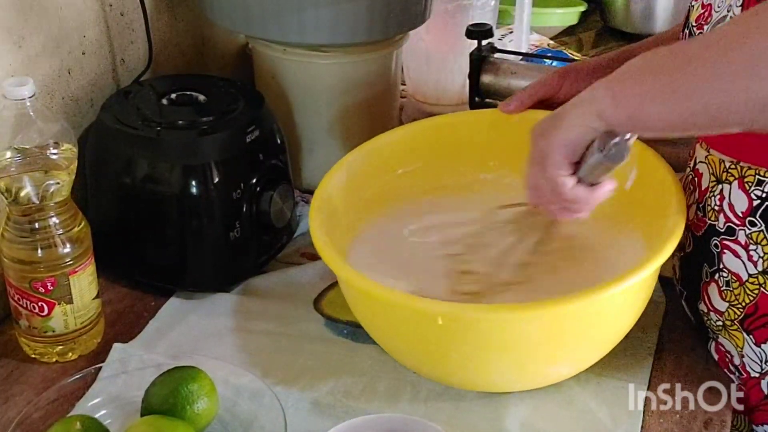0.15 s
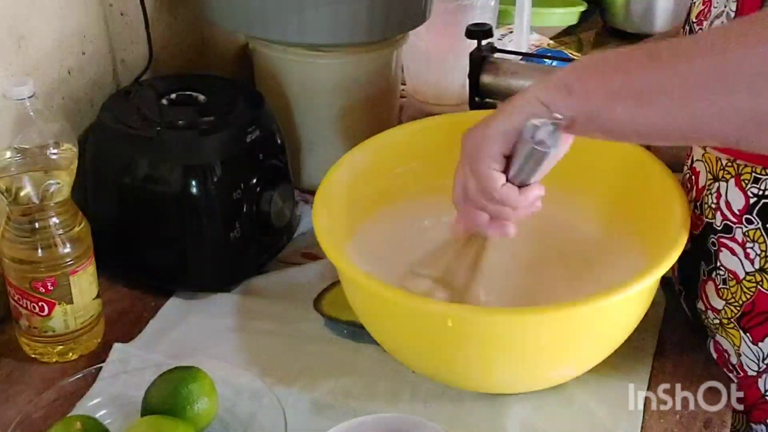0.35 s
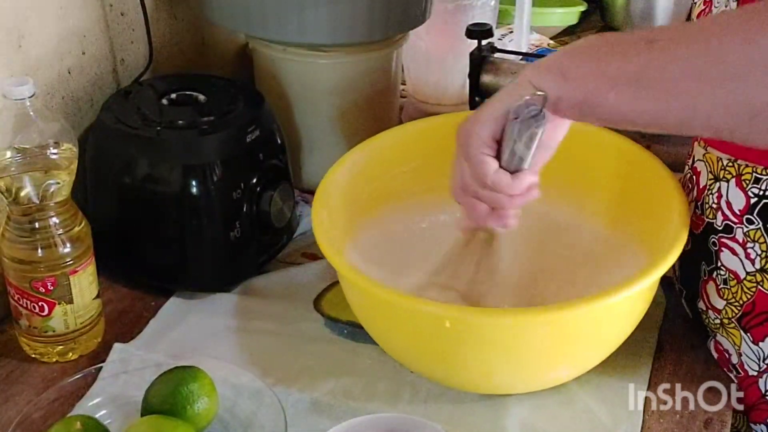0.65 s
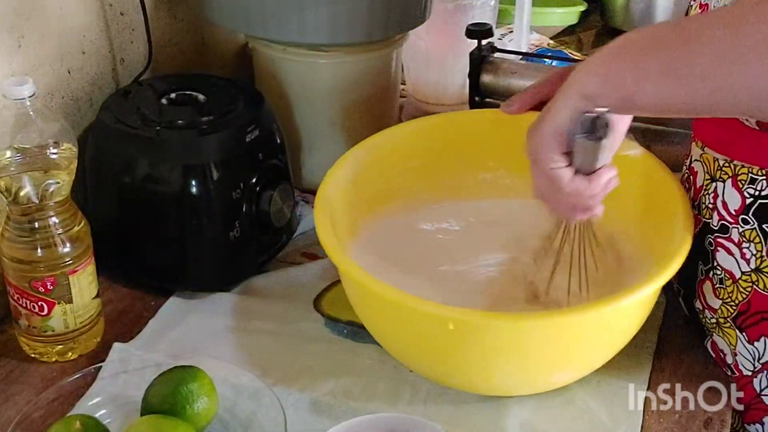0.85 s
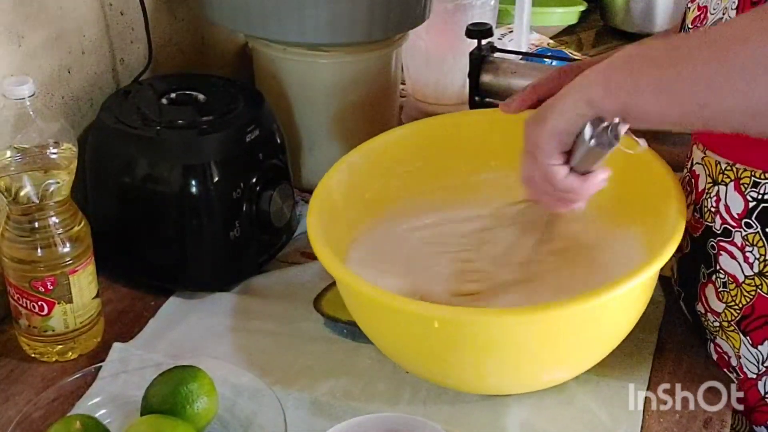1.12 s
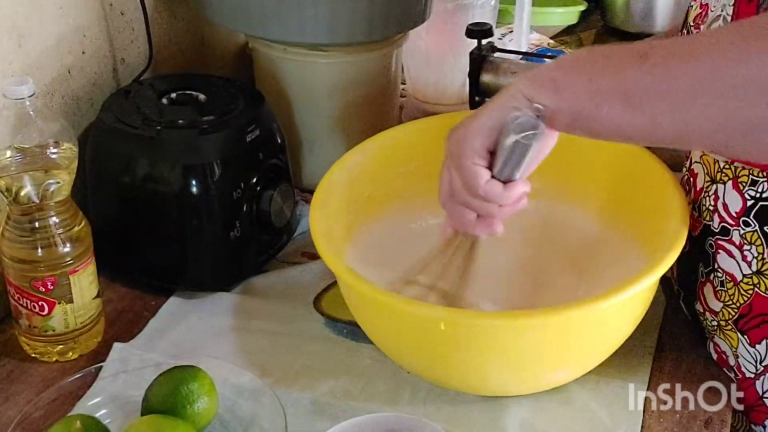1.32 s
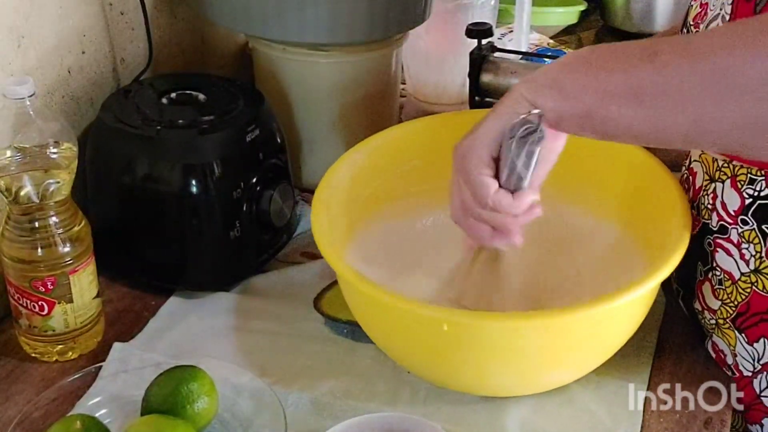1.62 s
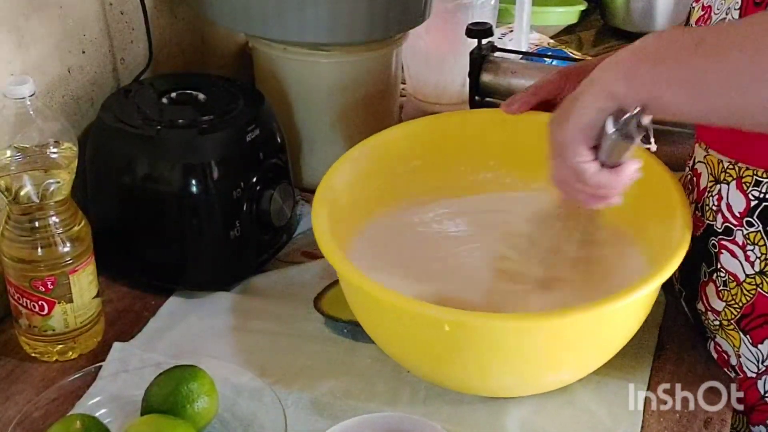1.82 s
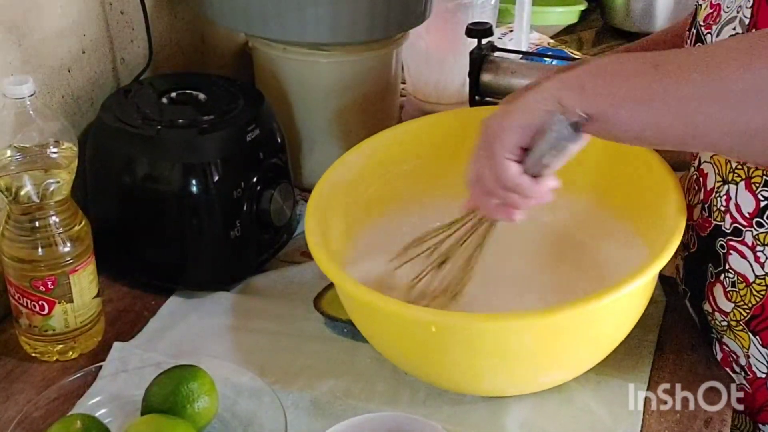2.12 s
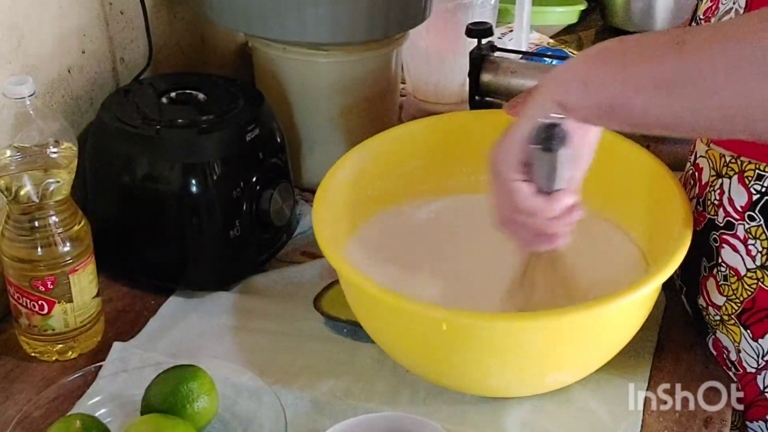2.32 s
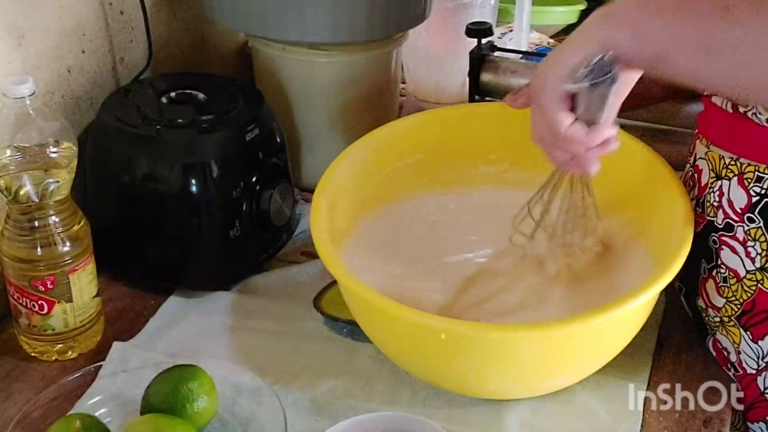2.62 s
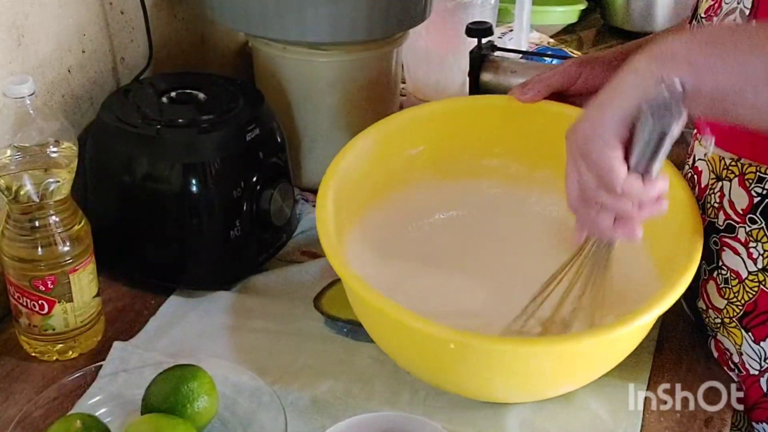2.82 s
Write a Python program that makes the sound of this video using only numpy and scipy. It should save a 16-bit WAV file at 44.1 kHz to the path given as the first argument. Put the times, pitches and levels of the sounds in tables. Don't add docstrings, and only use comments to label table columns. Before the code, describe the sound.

A whisk beats runny batter, wires ticking and knocking a plastic bowl over faint low hum

```python
import sys
import numpy as np
from scipy import signal
from scipy.fft import rfft, irfft
from scipy.io import wavfile
from scipy.ndimage import uniform_filter1d

SR = 44100
rng = np.random.default_rng(int(sys.argv[2]) if len(sys.argv) > 2 else 0)


def natural_amplitude(level_db):
    exponent = np.asarray(level_db, float) / 20
    return 10 ** exponent


def master(y):
    cut = np.clip(np.atleast_2d(y).T, -1, 1)
    pcm = np.round(cut * 32767)
    wavfile.write(sys.argv[1], SR, pcm.astype(np.int16))


N = 130095

# frequency in Hz, level in dB, t60 in seconds.
WALL_MODES = [(480, 5.5, 0.052), (700, -27, 0.099), (790, -2.5, 0.21), (915, -6, 0.22), (1115, -24, 0.039),
              (1360, 5.5, 0.051), (1460, 9.5, 0.047), (1900, -50.5, 0.035), (2310, 2, 0.026),
              (2580, -25.5, 0.027), (2890, -26, 0.034), (3310, -17, 0.036), (4450, 1, 0.015)]
# frequency in Hz, t60 in seconds.
BOWL_MODES = [(88, .15), (138, .2), (192, .08), (231, .09), (262, .06), (311, .075), (352, .07), (471, .07),
              (550, .07)]
# frequency in Hz, level in dB per Hz.
FIZZ_SPECTRUM = [(2350, -1.5), (4000, -1), (5870, -6), (8400, -3), (10800, -7), (15100, -11.5),
                 (16000, -36)]
# frequency in Hz, likeness from 0 to 1.
LIKENESS = [(60, .9), (130, .93), (290, .78), (640, .6), (1200, .05)]


def evened(x):
    return x / np.sqrt(np.mean(x ** 2) + 1e-20)


def read(points, hz):
    f, value = np.transpose(points)
    return np.interp(np.log(hz + 1), np.log(f + 1), value)


def add(mix, s, sound):
    part = mix[..., round(s * SR):][..., :sound.shape[-1]]
    part += sound[..., :part.shape[-1]]


def matched(left, other, hz):
    same = np.clip(read(LIKENESS, hz), -1, 1)[:, None]
    return np.array([left, same * left + np.sqrt(1 - same ** 2) * other])


def hiss(spectrum, patchy_db, flicker_db, size=512):
    hop = size // 4
    frames, hz = N // hop + 5, np.fft.rfftfreq(size, 1 / SR)
    a, b, c, d, patches = rng.standard_normal((frames, len(hz), 5)).T
    patches = uniform_filter1d(patches, size=8, axis=0)
    patches = evened(uniform_filter1d(patches, size=10, axis=1))
    flicker = evened(uniform_filter1d(rng.standard_normal(frames), size=3))
    z = matched(a + 1j * b, c + 1j * d, hz)
    z *= natural_amplitude(read(spectrum, hz)[:, None] + patchy_db * patches + flicker_db * flicker)
    return evened(signal.istft(z, nperseg=size, noverlap=size - hop)[1][:, :N])


def ring(t, hz, db, t60):
    decay = natural_amplitude(db - 60 * t[:, None] / t60)
    return (decay * np.sin(2 * np.pi * hz * t[:, None])).sum(1)


def bunch(spread_s, draws):
    at = spread_s * draws[:, 0] * 2 * np.arange(len(draws)) / len(draws)
    push = np.sign(draws[:, 1] - 0.5) * (0.24 + draws[:, 2]) * np.exp(-0.8 * at / spread_s)
    train = np.zeros(int(at.max() * SR) + 1)
    np.add.at(train, (at * SR).astype(int), push)
    return train / np.linalg.norm(train)


def taps():
    # start in seconds, level in dB, fizz over level in dB, favoured pitch in Hz.
    tap_table = [(0.003, -40, -12, 790), (0.116, -36.5, -22.5, 1340), (0.317, -38.5, -10.5, 754),
                 (0.642, -35, -14, 2310), (0.657, -51, -28, 1460), (0.742, -44, -29, 700),
                 (0.77, -42, -27, 1430), (0.824, -41, -37, 790), (0.926, -43, -38, 805),
                 (0.954, -36, -16, 3310), (1.088, -39, -31, 1115), (1.148, -45.5, -30, 1400),
                 (1.256, -46, -35, 1360), (1.279, -34.5, -21.5, 1290), (1.415, -36, -23.5, 790),
                 (1.508, -48, -12, 3310), (1.538, -68, -31, 1390), (1.594, -37, -23, 1360),
                 (1.739, -37.5, -24, 1115), (2.118, -46.5, -15, 1900), (2.229, -45, -20, 915),
                 (2.333, -42.5, -38, 1360), (2.493, -38, -22, 1430), (2.506, -39.5, -28, 1115),
                 (2.592, -47.5, -10, 700), (2.832, -25.5, -21, 1320), (2.937, -23.5, -16, 1360)]
    # frequency in Hz, level in dB per Hz.
    crack_spectrum = [(180, -10.5), (300, -2.5), (818, -5.5), (1380, -6), (1870, -10.5), (3290, -13),
                      (6000, -33), (7800, -79), (13200, -120)]
    all_db, ring_db, crack_db, fizz_gain_db = -3, 0.5, -0.5, 8.0 - 0.76
    crack_s, fizz_s, snap_s, snap_db = 0.0077, 0.0097, 0.0017, 4
    t, (hz, db, t60) = np.arange(6000) / SR, np.transpose(WALL_MODES)
    rings, crack, fizz = np.zeros(N), np.zeros(N), np.zeros(N)
    crack_shape = np.exp(-2 * t / crack_s)
    fizz_shape = np.exp(-2 * t / fizz_s) + natural_amplitude(2 * snap_db) * np.exp(-2 * t / snap_s)
    fizz_shape *= np.minimum(t / 0.0013, 1)
    draws = rng.random((len(tap_table), 20, 3))
    for (s, level_db, fizz_db, near_hz), draw in zip(tap_table, draws):
        train = bunch(0.0083, draw[:7])
        vary = draw[7:7 + len(hz)] - 0.5
        favour_db = 8 * np.exp(-(np.log2(hz / near_hz) / 0.14) ** 2)
        body = ring(t, hz * (1 + 0.04 * vary[:, 0]), db + 6 * vary[:, 1] + favour_db, t60)
        sound = signal.fftconvolve(train, body / abs(body).max())
        add(rings, s, natural_amplitude(level_db + ring_db) * sound)
        add(crack, s, natural_amplitude(2 * level_db) * signal.fftconvolve(train ** 2, crack_shape))
        add(fizz, s, natural_amplitude(2 * (level_db + fizz_db)) * fizz_shape)
    burst = natural_amplitude(crack_db) * np.sqrt(abs(crack)) * hiss(crack_spectrum, 2, 0)
    burst += natural_amplitude(fizz_gain_db) * np.sqrt(abs(fizz)) * hiss(FIZZ_SPECTRUM, 1.0, 0)
    return natural_amplitude(all_db) * rings, natural_amplitude(all_db) * burst


def ticks():
    # start in seconds, level in dB, pitch in Hz.
    knock_table = [(.032, -44.5, 2310), (.302, -45, 2500), (.318, -43, 342), (.452, -48, 1460),
                   (.47, -42, 1430), (.52, -45, 306), (.55, -49, 1530), (.621, -46, 2420),
                   (.645, -37, 2470), (.642, -41, 483), (.657, -39.5, 1460), (.658, -43, 3270),
                   (.742, -47, 480), (.743, -38, 139), (.744, -61, 1410), (.76, -42, 358),
                   (.802, -39.5, 333), (.82, -40.5, 1420), (.822, -40.5, 790), (.826, -39.5, 480),
                   (.843, -48, 327), (.83, -43, 139.5), (.896, -42.5, 1260), (.928, -42, 1360),
                   (.955, -38, 3300), (.956, -41, 1320), (.974, -42, 2400), (1.05, -36, 142),
                   (1.222, -47, 1300), (1.258, -40, 480), (1.275, -39, 470), (1.3, -38.5, 135),
                   (1.395, -33, 137), (1.411, -39, 1130), (1.419, -27.5, 480), (1.421, -37, 792),
                   (1.455, -49, 480), (1.49, -44, 560), (1.537, -45, 513), (1.538, -42.5, 1400),
                   (1.594, -42, 518), (1.602, -45, 1320), (1.736, -47, 1130), (1.967, -46, 211),
                   (2.028, -41.5, 493), (2.116, -39.5, 1810), (2.124, -40, 1010), (2.228, -42, 935),
                   (2.33, -53, 1390), (2.332, -41.5, 463), (2.441, -41.5, 130.6), (2.595, -44, 542),
                   (2.832, -31.5, 1380), (2.838, -37, 1410), (2.836, -32.5, 940), (2.856, -36, 920),
                   (2.88, -37.5, 1390), (2.903, -37.5, 1400), (2.939, -28, 495)]
    overtone_db, click_db = -11, -13
    t, out = np.arange(4000) / SR, np.zeros(N)
    for s, db, hz in knock_table:
        t60 = 0.016 + 17 / hz
        body = ring(t, hz * np.array([1, 1.7]), np.array([0, overtone_db]), t60 * np.array([1, 0.6]))
        click = natural_amplitude(click_db) * (1 - 9 * hz * t) * np.exp(-9 * hz * t)
        add(out, s, natural_amplitude(db) * (body + click))
    return out


def thuds():
    # start in seconds, level in dB, favoured pitch in Hz.
    push_table = [(0.001, -34.5, 174), (.12, -33.5, 238), (0.221, -47, 554), (0.31, -40, 138),
                  (.462, -32.5, 228), (0.488, -38.5, 88), (0.624, -35.5, 138), (0.648, -40, 138),
                  (0.74, -41, 192), (.77, -34.5, 191), (0.801, -49.5, 304), (0.827, -41.5, 480),
                  (0.95, -42, 325), (1.086, -40.5, 556), (1.102, -35, 138), (1.12, -37.5, 233),
                  (1.273, -40.5, 480), (1.399, -34.5, 138), (1.413, -35, 303), (1.42, -36.5, 480),
                  (1.592, -37, 380), (1.736, -48.5, 300), (2.106, -38.5, 253), (2.225, -35.5, 279),
                  (2.345, -44.5, 466), (2.498, -40.5, 302), (2.838, -37, 240), (2.846, -34, 480),
                  (2.935, -26.5, 224)]
    favour_oct, favour_db = 0.22, 8.5
    t, (hz, t60), out = np.arange(12000) / SR, np.transpose(BOWL_MODES), np.zeros(N)
    for (s, level_db, near_hz), draw in zip(push_table, rng.random((len(push_table), 17, 3))):
        octaves = abs(np.log2(hz / near_hz))
        db = -favour_db * np.minimum(octaves / favour_oct, 1.5) + 4 * (draw[8:, 0] - 0.5)
        body = ring(t, hz, db, t60) * np.minimum(t / 0.0034, 1)
        sound = signal.fftconvolve(bunch(0.02, draw[:8]), body)
        add(out, s, natural_amplitude(level_db - 0.5) * sound / abs(sound).max())
    return out


def sparse(per_s, spread_db):
    return (rng.random(N) < per_s / SR) * natural_amplitude(spread_db * np.minimum(rng.exponential(1, N), 4))


def crackle(per_s, spread_db, grain_s):
    pops = sparse(per_s, spread_db)
    grain = np.exp(-np.arange(2000) / SR / grain_s)
    return evened(np.sqrt(abs(signal.oaconvolve(pops ** 2, grain)[:N])))


def stirring():
    # time in seconds, drag level in dB, swish level in dB.
    effort = [(0, -61, -63), (.14, -52, -58.5), (.29, -61.5, -66), (.45, -54.5, -60), (.6, -60.5, -65),
              (.85, -59.5, -62), (1.2, -57, -61), (1.37, -58.5, -61.5), (1.57, -58, -66.5),
              (1.8, -56, -60.5), (1.928, -60.5, -68.5), (2.1, -58.5, -58.5), (2.2, -61.5, -67),
              (2.32, -62, -66.5), (2.44, -55.5, -57), (2.481, -61.5, -64), (2.6, -56.5, -64),
              (2.7, -79, -76.5)]
    # frequency in Hz, level in dB per Hz.
    slosh_spectrum = [(71, 10.5), (120, -13.5), (190, -2.5), (459, -7), (524, -8.5), (680, -10.5),
                      (1210, -16.5), (2650, -16.5), (6000, -29), (7800, -106), (13200, -120)]
    grit_db, rumble_db, slosh_db = -5.5, -1.5, 9
    s, drag_db, swish_db = np.transpose(effort)
    now, t = np.arange(N) / SR, np.arange(4000) / SR
    drag, swish = natural_amplitude(np.interp(now, s, drag_db)), natural_amplitude(np.interp(now, s, swish_db))
    clicks = sparse(500, 2.5) * rng.choice([-1, 1], N)
    grit = evened(signal.oaconvolve(clicks, ring(t, *np.transpose(WALL_MODES)))[:N])
    low_hz, low_t60 = np.transpose(BOWL_MODES[1:])
    low_ring = ring(t, low_hz, np.zeros(len(low_hz)), low_t60)
    rumble = evened(signal.oaconvolve(np.roll(clicks, SR), low_ring)[:N])
    scrape = drag * (natural_amplitude(grit_db) * grit + natural_amplitude(rumble_db) * rumble)
    wash = natural_amplitude(slosh_db) * drag * crackle(500, 2.0, 0.0035) * hiss(slosh_spectrum, 2.6, 0.52)
    wash += swish * crackle(270, 0.52, 0.0059) * hiss(FIZZ_SPECTRUM, 1.24, 0, size=256)
    return scrape, wash


def kitchen(x):
    # frequency in Hz, t60 in seconds.
    echo_time = [(150, 0.35), (600, 0.35), (2000, 0.33), (14000, 0.24)]
    echoes = np.zeros((2, SR // 2))
    at = np.arange(100, SR // 2 - 20, 20)
    at = at + rng.integers(0, 20, (2, len(at)))
    np.put_along_axis(echoes, at, rng.choice([-1., 1.], at.shape), 1)
    hz, t, z = signal.stft(echoes, SR, nperseg=512)
    z = matched(z[0], z[1], hz) * natural_amplitude(-60 * t / read(echo_time, hz)[:, None])
    tail = signal.istft(z, SR, nperseg=512)[1]
    return signal.fftconvolve(x, tail / np.linalg.norm(tail[0]), axes=1)[:, :N]


def hum():
    # start in seconds, length in seconds, level in dB, pitch in Hz.
    swells = [
        (0.944, 0.16, -38.5, 80.5),
        (1.135, 0.094, -40, 81.7),
        (1.896, .15, -38, 78.5),
        (2.081, 0.11, -36, 81.9),
    ]
    rise_s, fall_s = 0.038, 0.014
    drone_hz, drone_width_hz, drone_db = 58, 1.8, -52
    out = np.zeros(N)
    for start, length, db, hz in swells:
        t = np.arange(0, length + 4 * fall_s, 1 / SR)
        shape = np.minimum(t / rise_s, 1) * np.exp(-np.maximum(t - length, 0) / fall_s)
        add(out, start, natural_amplitude(db) * np.sqrt(2) * shape * np.sin(2 * np.pi * hz * t))
    hz = np.fft.rfftfreq(N, 1 / SR)
    resonance = 1 / (1 + (2 * (hz - drone_hz) / drone_width_hz) ** 2)
    drone = irfft(rfft(rng.standard_normal(N)) * resonance, N)
    return out + natural_amplitude(drone_db) * evened(drone)


def room_tone():
    # frequency in Hz, level in dB per Hz.
    room_spectrum = [(15, -29), (25, -17), (59, 0.5), (145, -15), (489, -34), (641, -29), (1040, -28),
                     (2050, -42.5), (16000, -57)]
    return natural_amplitude(-48.5) * hiss(room_spectrum, 1.0, 0.14, size=2048)


def across_ports(x):
    # frequency in Hz, phase between the ports in radians.
    port_phase = [(300, .3), (600, .8), (1100, 1.6)]
    turn = np.exp(1j * read(port_phase, np.fft.rfftfreq(N, 1 / SR)))
    return np.array([x, irfft(rfft(x) * turn, N)])


def scene():
    rings, burst = taps()
    scrape, wash = stirring()
    near = across_ports(rings + scrape + ticks()) + thuds() + burst
    echo = kitchen(near.mean(0)[None] + burst[:1] / 2)
    return near + natural_amplitude(-2.5) * echo + wash + hum() + room_tone()


def low_pass(x):
    return signal.sosfilt(signal.butter(12, 16470, fs=SR, output="sos"), x)


def record(dry):
    # frequency in Hz, left over right in dB.
    port_colour = [(100, -.3), (160, 1.8), (600, 1), (4000, -1.5), (8000, 2.4), (14000, 3)]
    hz = np.fft.rfftfreq(N, 1 / SR)
    tilt_db = read(port_colour, hz) / 2
    bass_cut = 1 / (1 + (42 / (hz + 1)) ** 4)
    response = natural_amplitude([tilt_db, -tilt_db]) * (hz < 15950) * bass_cut
    return low_pass(irfft(rfft(dry) * response, N))


dry = scene()
out = record(dry)
master(out)
```